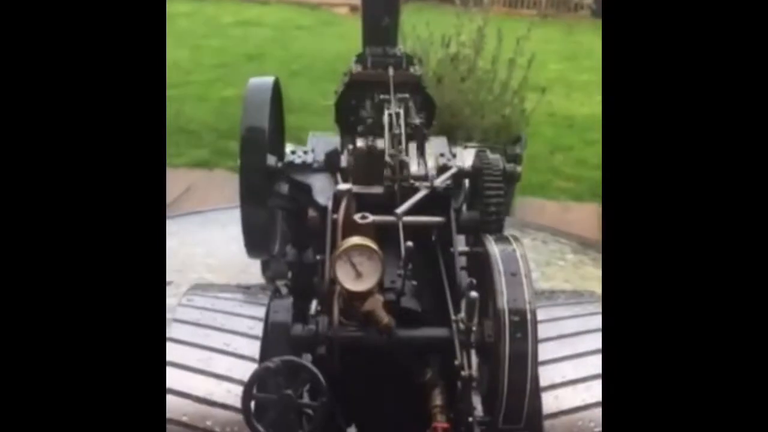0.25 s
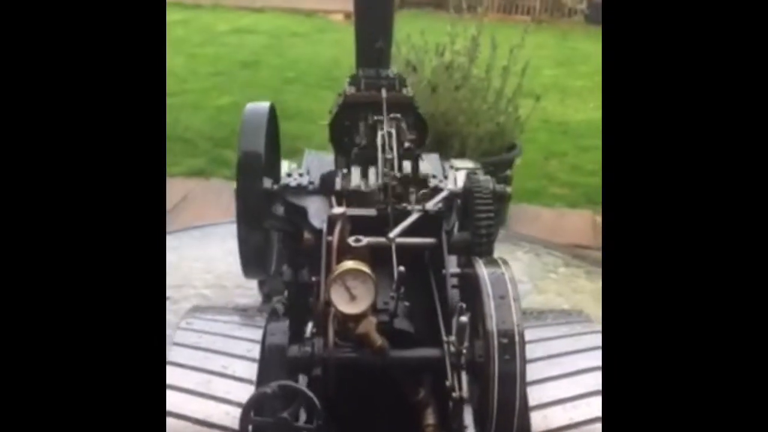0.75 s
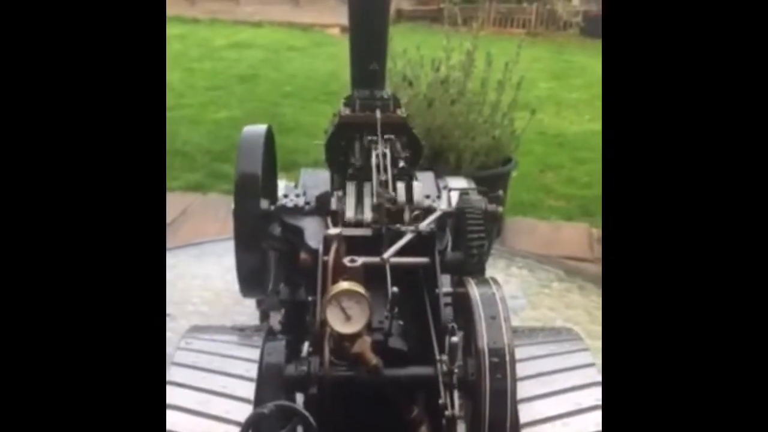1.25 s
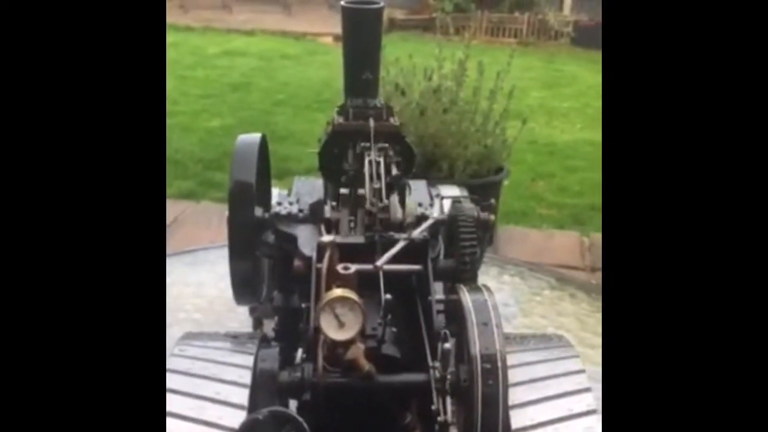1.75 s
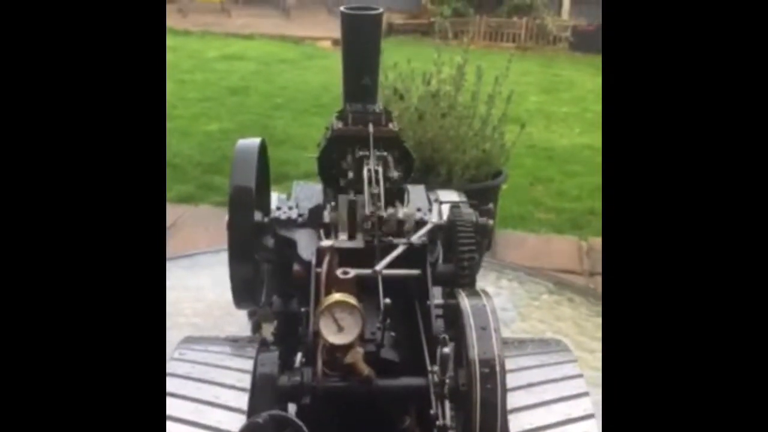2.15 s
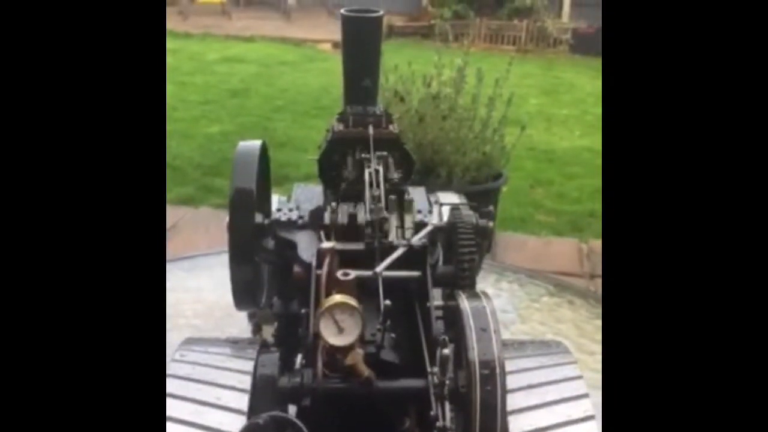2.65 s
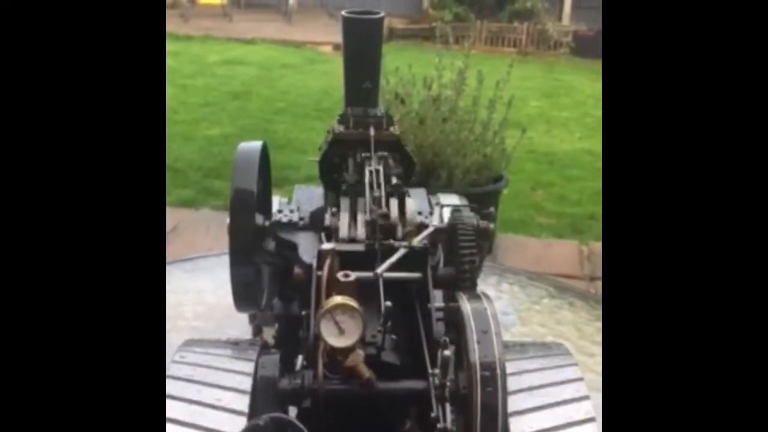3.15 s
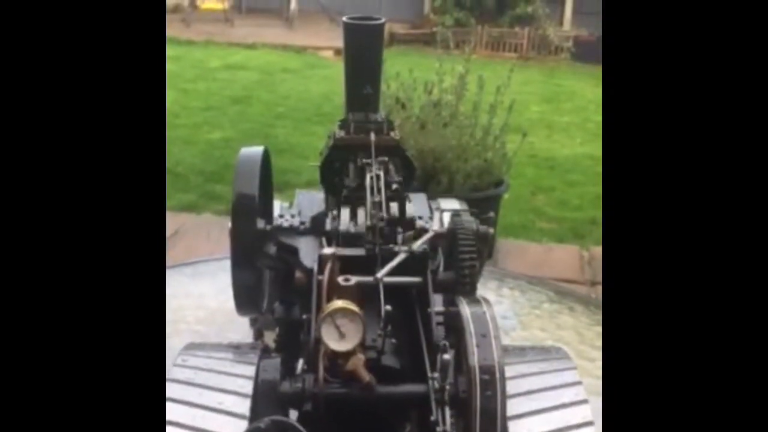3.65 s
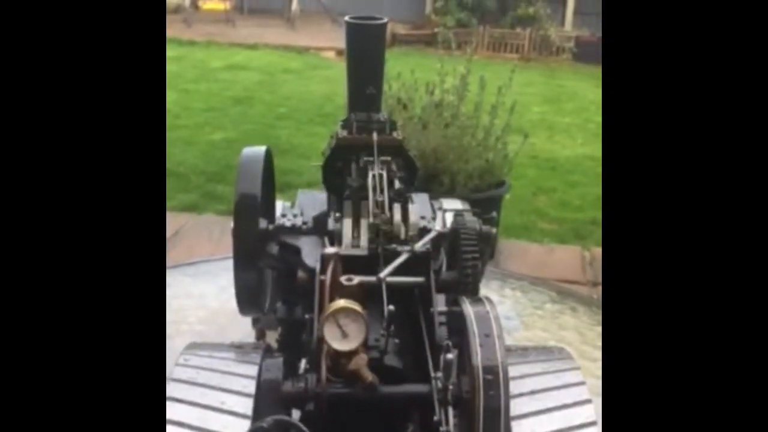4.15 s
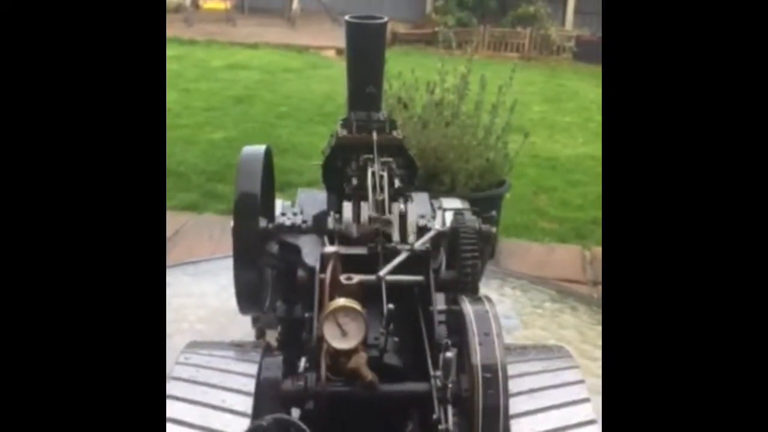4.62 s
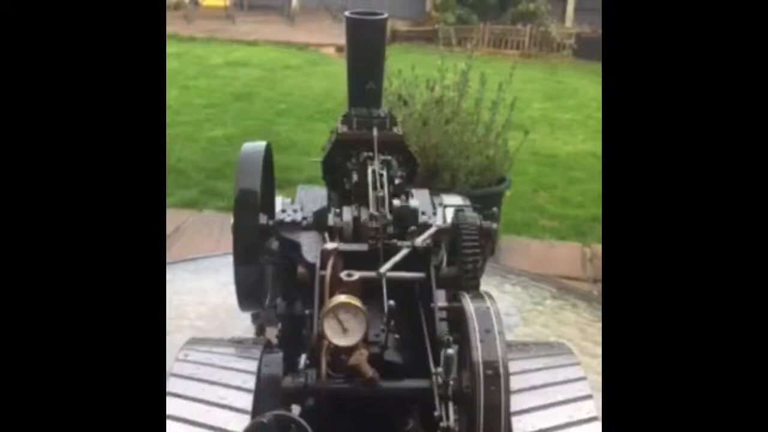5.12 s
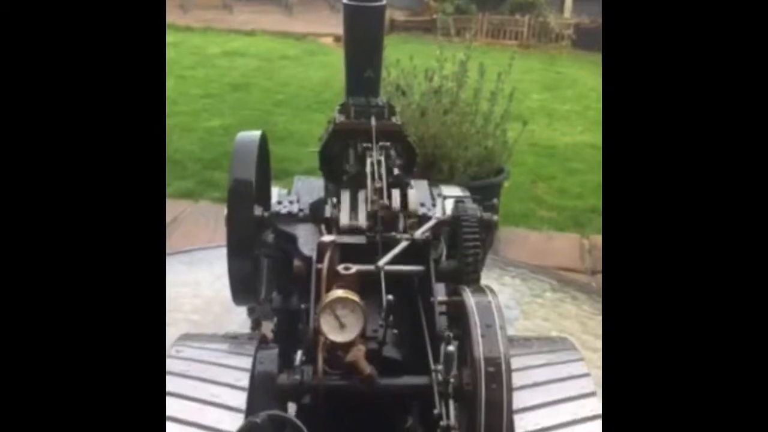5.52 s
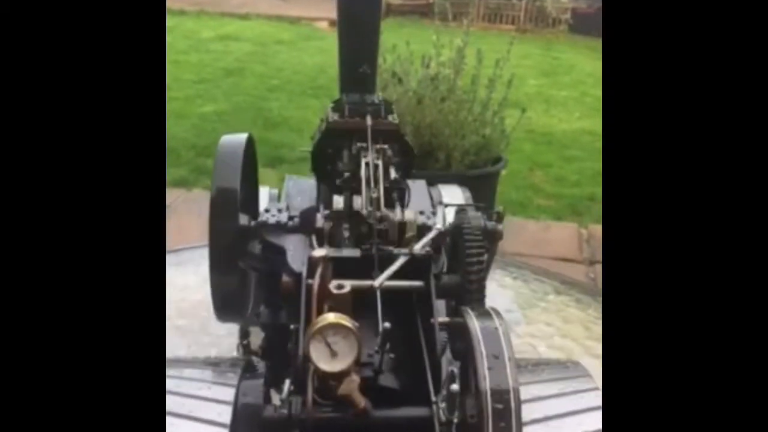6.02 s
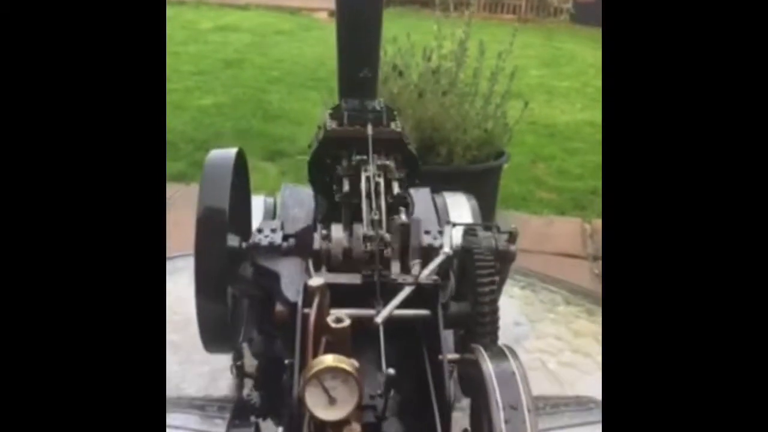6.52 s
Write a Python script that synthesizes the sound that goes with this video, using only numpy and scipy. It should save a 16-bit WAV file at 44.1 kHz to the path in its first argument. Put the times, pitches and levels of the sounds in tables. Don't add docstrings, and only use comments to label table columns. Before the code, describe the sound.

A thin leaking hiss and quick, hollow metal knocks start immediately, with a few light ticks. The steam suddenly swells to a bright rushing roar with resonant chimney tones, flutters, and gradually subsides under the unbroken beat. Later come sharp drop snaps, clustered dull taps and a small thump. Outdoors, dry and close, mono, with soft air and a distant low drone becoming clearer.

```python
import sys
import numpy as np
from scipy import signal
from scipy.fft import rfft, irfft, next_fast_len
from scipy.io import wavfile
from scipy.ndimage import uniform_filter1d

SR = 44100
rng = np.random.default_rng(int(sys.argv[2]) if len(sys.argv) > 2 else 0)


def decibels_to_gain(level_db):
    exponent = np.asarray(level_db, float) / 20
    return 10 ** exponent


def materialize(psi):
    bounded = np.clip(np.atleast_2d(psi).T, -1, 1)
    quanta = np.round(bounded * 32767).astype(np.int16)
    wavfile.write(sys.argv[1], SR, quanta)


N = 298998
TIME_S = np.arange(N) / SR

# t/s, flow above idle/dB, chimney singing/dB
STEAM_FLOW = [(0.0, 0, 0), (0.77, 0, 1), (0.80, 8.5, 1), (0.93, 1, -0.5), (0.96, 13.5, 2.5),
              (1.02, 11.5, -6.5), (1.1, 12.5, -3.5), (1.5, 9.5, -4.5), (1.84, 8.5, 0.5), (1.88, 8.5, 3.5),
              (2.5, 5.5, 1), (3.6, 6, 1), (3.78, 5, -2.5), (3.9, 5, 1.5), (4.6, 3.5, 1), (4.72, 2.5, 0),
              (5.7, 1.5, -3), (6.78, 3.5, -8.5)]
# f/Hz, width/Hz, level/dB
CHIMNEY_LOW = [(1353, 61.6, 2.5), (1269, 100, -8.5), (1170, 37, -10.5), (963, 174, -22)]
# f/Hz, width/Hz, level/dB
CHIMNEY_HIGH = [(1892, 380, -5), (2597, 59, 4.5), (2723, 157, 2), (2948, 300, -4), (3750, 256, 1),
                (4330, 226, -6)]
# f/Hz, width/Hz, level/dB
FITTINGS = [
    [(5520, 410, 5.5), (6430, 370, 2), (7030, 330, 2), (8170, 550, 0), (8740, 370, -3.5)],
    [(9610, 1200, -2), (10970, 290, 3.5), (11800, 340, 0), (12900, 440, -2.5), (14000, 700, -7),
     (15250, 710, -2)],
]
# f/Hz, density/dB per Hz
LEAK_COLOUR = [(710, -34), (1200, -8.5), (1380, -8), (1610, -31), (2680, -12), (4800, -18), (5590, -18.5),
               (16000, -23.5)]
# t/s, knock peak/dB, puff force/dB
CRANK_TURNS = [(0.139, -34.5, 0), (0.414, -36, -0.5), (0.699, -37, 1), (0.979, -37, 2), (1.229, -35.5, 0.5),
               (1.493, -35.5, -1), (1.756, -40, 0.5), (2.022, -35.5, 0), (2.292, -36, 0.5),
               (2.572, -36.5, 0.5), (2.85, -35, 0.5), (3.128, -35.5, -0.5), (3.394, -38.5, 3),
               (3.63, -42, -1.5), (3.872, -40.5, -0.5), (4.138, -38, 0.5), (4.411, -36.5, -1.5),
               (4.672, -35.5, 1.5), (4.942, -37, -1.5), (5.217, -37.5, 1), (5.49, -35.5, -0.5),
               (5.763, -36, -0.5), (6.037, -34.5, 1.5), (6.319, -36, -1.5), (6.593, -32.5, 0.5)]
# f/Hz, level/dB, t60/s
FRAME_MODES = [(329.2, 8.5, 0.14), (346, -0.5, 0.07), (460, -16, 0.028), (553, 2, 0.068), (260, 4.5, 0.044)]
# crank angle/turns, length/turns, f/Hz, width/Hz, level/dB
PUFFS = [(0.9, 0.075, 152.5, 6.9, -46), (0.138, 0.052, 152, 7, -50.5), (0.558, 0.039, 162, 8.4, -46),
         (0.838, 0.039, 366, 54, -50), (0.512, 0.037, 341, 58, -48.5), (0.35, 0.2, 328, 12, -55),
         (0.93, 0.13, 574, 7.6, -51.5), (0.265, 0.056, 570, 7, -58), (0.017, 0.14, 825, 8.8, -56.5),
         (0.085, 0.058, 920, 20, -52.5), (0.92, 0.23, 432, 9.6, -57.5), (0.82, 0.04, 324, 28, -53),
         (0.3, 0.6, 152, 7, -56), (.53, 0.045, 230, 90, -62.5)]
# t/s, length/s, f/Hz, width/Hz, level/dB
SPITS = [(2.83, .006, 5500, 4700, -36.5), (2.85, .015, 14500, 300, -52), (3.35, .025, 14450, 300, -54),
         (3.34, .012, 6100, 2315, -47.5), (6.047, 0.008, 500, 900, -44), (6.056, .004, 5500, 500, -47),
         (6.06, .02, 1700, 1200, -46), (.962, .006, 5600, 2500, -40), (.01, 0.016, 180, 80, -38.5),
         (6.047, .01, 210, 120, -34), (4.538, .003, 2680, 500, -43), (6.176, 0.0035, 2670, 300, -38),
         (6.306, 0.0019, 1500, 1500, -39)]
# t/s, peak/dB, ring f/Hz, bright ring/dB, bright f/Hz
TICKS = [
    (0.2862, -25, 2420, -15, 4970),
    (0.594, -14, 4430, 7, 11900),
    (0.7755, -21.5, 3260, -3, 5000),
    (4.8312, -9, 3200, -3, 8500),
    (5.5381, 0, 3310, -3.5, 6050),
]
# t/s, peak/dB, f/Hz
TAPS = [(2.194, -36, 700), (4.534, -35.5, 707), (4.793, -31, 680), (4.841, -31.5, 684), (5.404, -38, 966),
        (5.596, -30.5, 700), (5.623, -37, 780), (5.936, -34, 710), (6.0362, -30, 910), (6.05, -31, 820),
        (6.304, -29.5, 646), (6.433, -34.5, 660)]
# t/s, peak/dB
THUMPS = [
    (0.341, -37),
    (1.039, -46),
    (1.449, -43.5),
    (2.499, -44),
    (2.549, -46),
    (3.779, -50),
    (6.047, -50),
]
# t/s, level/dB
DRONE_LEVEL = [(0.0, -71), (0.25, -68), (0.5, -52), (0.75, -61), (1.0, -51.5), (1.38, -49), (1.62, -61),
               (1.92, -48.5), (2.6, -57), (3.15, -72), (3.57, -52), (4.12, -46), (4.28, -56), (4.45, -44),
               (5.4, -41), (5.9, -53), (6.12, -43.5), (6.78, -37.5)]
# f/Hz, density/dB per Hz
GARDEN_COLOUR = [(15, -58), (25, -13), (70, -14), (240, -8.5), (380, 1), (520, -9.5), (1100, -7.5),
                 (2420, -63)]

ROAR_DB, UPPER_DB, LOWER_DB, TOP_DB = -44.5, -48.5, -52.5, -50
LOWER_DB_PER_DB, TOP_DB_PER_DB, TOP_LAG_S = 0.58, 0.31, 0.12
SNAP_DB, SNAP_DB_PER_DB = 11.5, 2.6
DRONE_HZ, SAG_HZ_PER_S, SAG_FROM_S = 100, 1.05, 2.8
GARDEN_DB = -52
MIX_TOP_HZ, MIC_BASS_HZ = 15760, 35


def noise(n=N):
    return rng.standard_normal(n)


def unit(x):
    return x / np.sqrt(np.mean(x ** 2))


def curves(table):
    t_s, *columns = np.transpose(table)
    return [np.interp(TIME_S, t_s, column) for column in columns]


def walk(rate_hz):
    hold = int(SR / rate_hz)
    steps = np.repeat(noise(N // hold + 1), hold)
    return uniform_filter1d(uniform_filter1d(steps, hold), hold)[:N]


def ring(x, hz, width_hz):
    return signal.lfilter(*signal.iirpeak(hz, hz / width_hz, SR), x)


def coloured(table):
    hz, db = np.transpose(table)
    f = np.fft.rfftfreq(N, 1 / SR) + 1
    gain = decibels_to_gain(np.interp(np.log(f), np.log(hz), db))
    return unit(irfft(rfft(noise()) * gain, N))


def struck(modes, push_s):
    t = np.arange(SR // 4) / SR
    y = sum(decibels_to_gain(db) * np.sin(2 * np.pi * hz * t) * 1000 ** (-t / t60_s) for hz, db, t60_s in modes)
    y = y * (1 - np.exp(-t / push_s))
    return y / np.abs(y).max()


def add(out, t_s, sound):
    i = int(t_s * SR)
    out[i:i + len(sound)] += sound[:N - i]


def jet(modes, flicker_db):
    out = np.zeros(N)
    for hz, width_hz, db in modes:
        band = ring(ring(noise(), hz, width_hz), hz, 1.9 * width_hz)
        out += decibels_to_gain(db + flicker_db * walk(40)) * band
    return unit(out)


def steam():
    flow_db, singing_db = curves(STEAM_FLOW)
    late_flow_db = np.interp(TIME_S - TOP_LAG_S / 2, TIME_S, flow_db)
    late_flow_db = uniform_filter1d(late_flow_db, int(TOP_LAG_S * SR))
    lower_db = LOWER_DB + LOWER_DB_PER_DB * flow_db
    top_db = TOP_DB + TOP_DB_PER_DB * late_flow_db

    roar = decibels_to_gain(ROAR_DB + flow_db + singing_db) * jet(CHIMNEY_LOW, flicker_db=3.0)
    upper = decibels_to_gain(UPPER_DB + flow_db) * jet(CHIMNEY_HIGH, flicker_db=1.5)
    lower_fittings = decibels_to_gain(lower_db) * jet(FITTINGS[0], flicker_db=2.5)
    top_fittings = decibels_to_gain(top_db - 2.5) * jet(FITTINGS[1], flicker_db=1.5)
    leak = decibels_to_gain(top_db + 4.5) * coloured(LEAK_COLOUR)
    gusts = decibels_to_gain(0.51 * walk(12) + 0.73 * walk(45))
    return roar + gusts * (upper + lower_fittings + top_fittings + leak)


def knocks():
    out = np.zeros(N)
    for t_s, knock_db, _ in CRANK_TURNS:
        wobble = noise(len(FRAME_MODES))
        modes = [(hz * (1 + 0.0047 * w), db + 1.4 * w, t60_s)
                 for (hz, db, t60_s), w in zip(FRAME_MODES, wobble)]
        add(out, t_s, -decibels_to_gain(knock_db + 4.0) * struck(modes, 0.003))
    return out


def hum(hz, width_hz):
    z = signal.hilbert(ring(noise(), hz, width_hz), next_fast_len(N))[:N]
    return unit(z.real / (np.abs(z) + 1e-9) ** 0.7)


def puffs():
    out = np.zeros(N)
    t_s, _, puff_db = np.transpose(CRANK_TURNS)
    turn_s = np.r_[2 * t_s[0] - t_s[1], t_s, 2 * t_s[-1] - t_s[-2]]
    turns = np.interp(TIME_S, turn_s, np.arange(len(turn_s)))
    force_db = np.interp(TIME_S, t_s, puff_db)
    hums = {}
    for angle, length, hz, width_hz, db in PUFFS:
        part = round(hz, -1)
        if part not in hums:
            hums[part] = hum(hz, width_hz)
        off_centre = (turns - angle + 0.5) % 1 - 0.5
        gate = np.exp(-0.5 * (off_centre / length) ** 2)
        out += decibels_to_gain(db + force_db) * gate * hums[part]
    return out


def spits():
    out = np.zeros(N)
    t = np.arange(-SR // 8, SR // 8) / SR
    for t_s, length_s, hz, width_hz, db in SPITS:
        grain = unit(ring(ring(noise(len(t)), hz, width_hz), hz, width_hz))
        burst = decibels_to_gain(db) * grain * np.exp(-0.5 * (t / length_s) ** 2)
        before_start = max(int((1 / 8 - t_s) * SR), 0)
        add(out, max(t_s - 1 / 8, 0), burst[before_start:])
    return out


def ticks(rows):
    out = np.zeros(N)
    for t_s, db, hz, bright_db, bright_hz in rows:
        snap_db = SNAP_DB + SNAP_DB_PER_DB * db
        body = [(hz, 0, 0.005), (0.6 * hz, -8, 0.004), (0.86 * hz, -2, 0.004)]
        bright = [(bright_hz, bright_db + 1.5, 0.003), (1.1 * bright_hz, bright_db + 0.1, 0.003)]
        snap = [(8000, snap_db, 0.0012), (9800, snap_db, 0.0015), (13000, snap_db + 4, 0.001)]
        tick = struck(body + bright + snap, 0.000083)
        add(out, t_s + 0.001, decibels_to_gain(db - 0.5) * tick)
        add(out, t_s + 0.0027, decibels_to_gain(db - 17) * tick)
    return signal.sosfilt(signal.butter(4, [900, 15000], "band", fs=SR, output="sos"), out)


def taps():
    out = np.zeros(N)
    for t_s, db, hz in TAPS:
        modes = [(hz, 0, 0.03), (1.55 * hz, -3, 0.012), (3.0 * hz, -8, 0.008),
                 (0.635 * hz, -4, 0.02), (0.23 * hz, -8, 0.04)]
        add(out, t_s, decibels_to_gain(db + 2.5) * struck(modes, 0.0001))
    return out


def thumps():
    out = np.zeros(N)
    for t_s, db in THUMPS:
        modes = [(62, 10, 0.15), (38, -9, 0.15), (170, 10, 0.051)]
        add(out, t_s, decibels_to_gain(db + 1.0) * struck(modes, 0.0033))
    return out


def drone():
    level_db, = curves(DRONE_LEVEL)
    hz = DRONE_HZ - SAG_HZ_PER_S * np.maximum(TIME_S - SAG_FROM_S, 0) + 0.59 * walk(4.01)
    tone = np.sqrt(2) * np.sin(2 * np.pi * np.cumsum(hz) / SR)
    fading_db = 4.1 * walk(12) * np.clip(SAG_FROM_S + 1 - TIME_S, 0.15, 1)
    rumble = decibels_to_gain(-60.0) * unit(ring(noise(), 79.0, 8.5))
    return decibels_to_gain(level_db + fading_db) * tone + rumble


def garden():
    return decibels_to_gain(GARDEN_DB + 2.2 * walk(3.13)) * coloured(GARDEN_COLOUR)


def scene():
    drops = np.array(TICKS)
    loud = drops[:, 1] > -6
    engine = steam() + knocks() + puffs() + spits()
    around = ticks(drops[~loud]) + taps() + thumps() + drone() + garden()
    f = np.fft.rfftfreq(N, 1 / SR)
    response = (f < MIX_TOP_HZ) * f ** 2 / (f ** 2 + MIC_BASS_HZ ** 2)
    mono = irfft(rfft(engine + around) * response, N) + ticks(drops[loud])
    return np.array([mono, mono])


def band_limit(x):
    return signal.sosfilt(signal.butter(12, 16970, fs=SR, output="sos"), x)


def record(dry):
    return band_limit(dry)


dry = scene()
out = record(dry)
materialize(out)
```